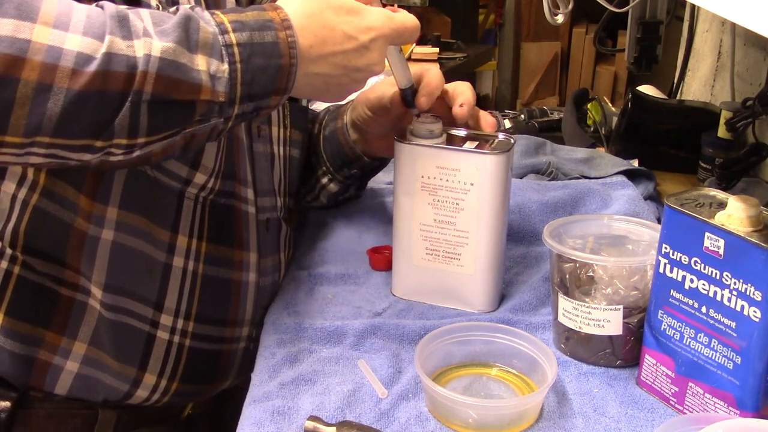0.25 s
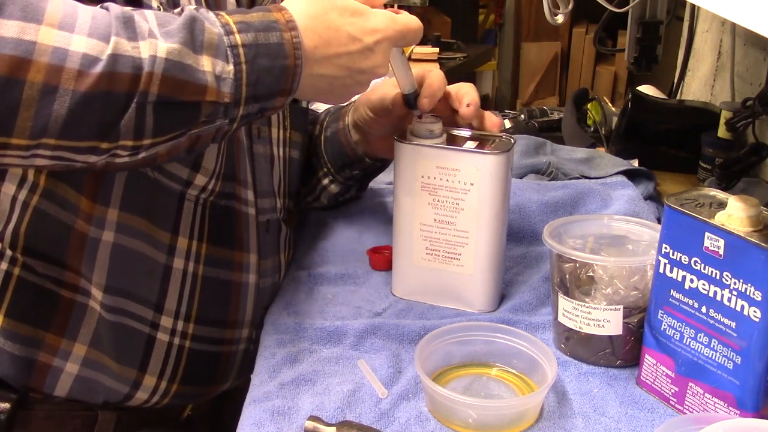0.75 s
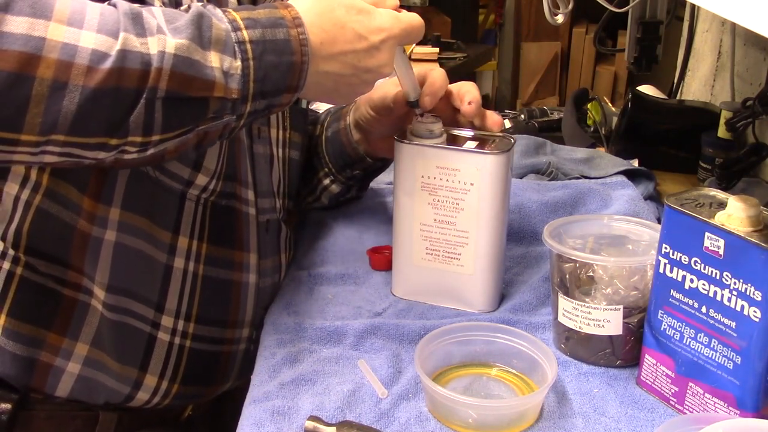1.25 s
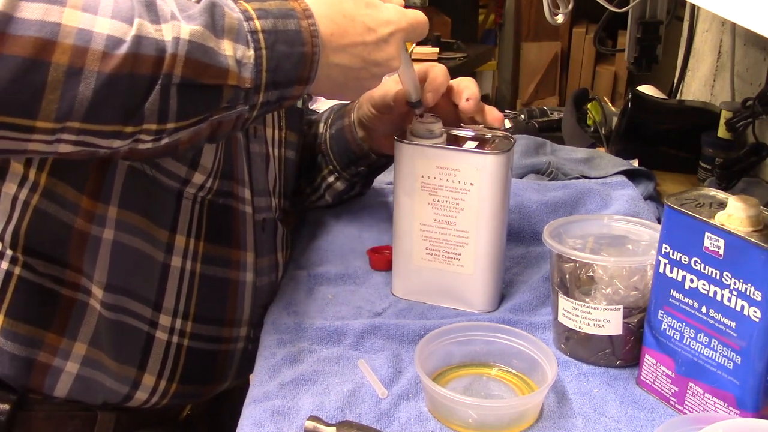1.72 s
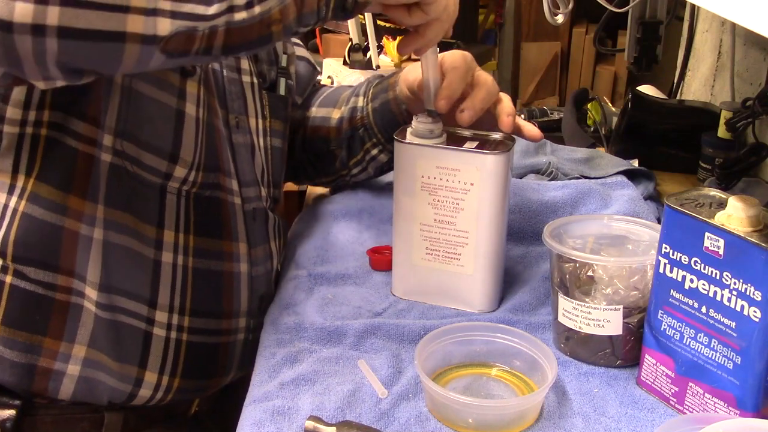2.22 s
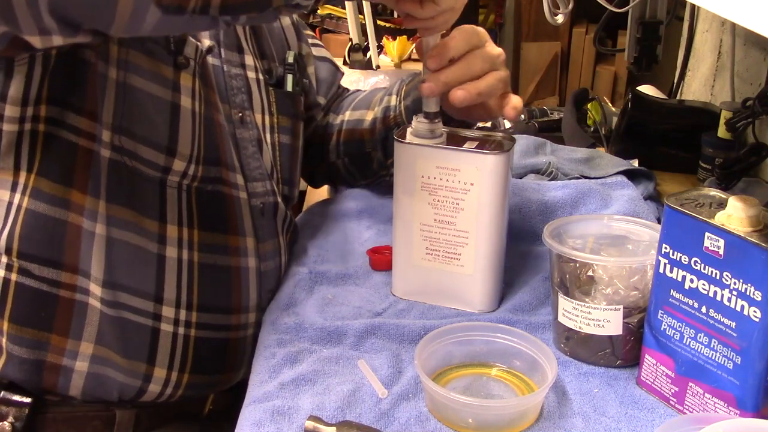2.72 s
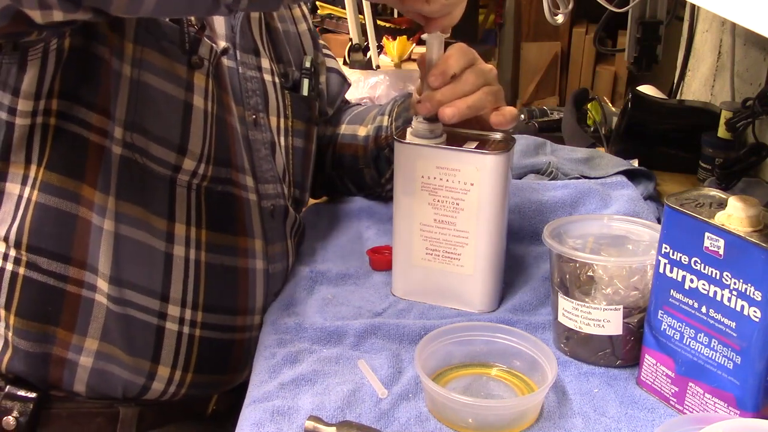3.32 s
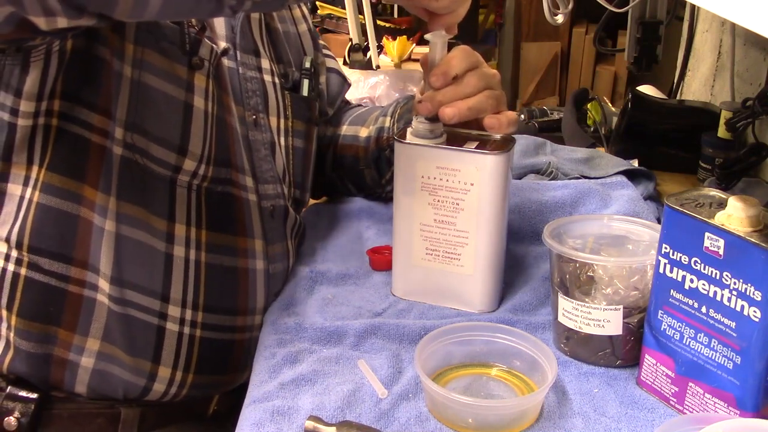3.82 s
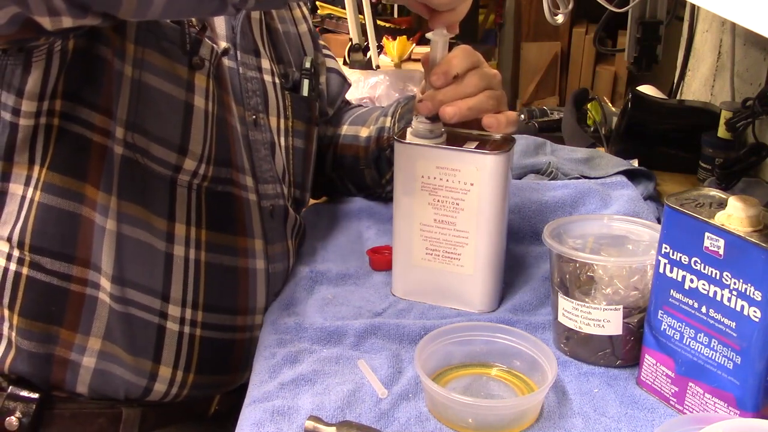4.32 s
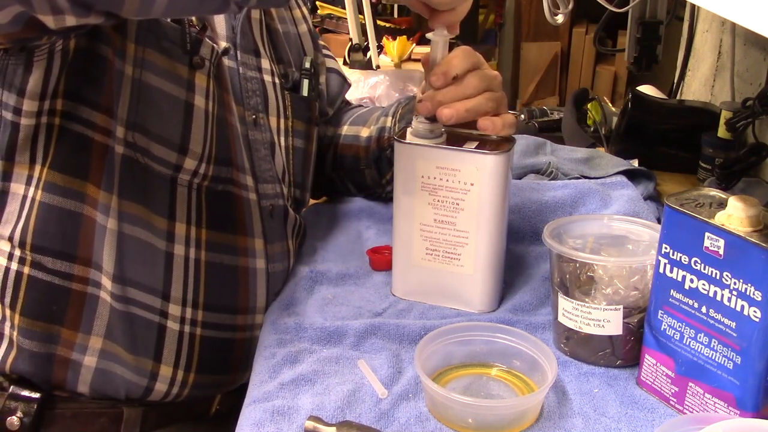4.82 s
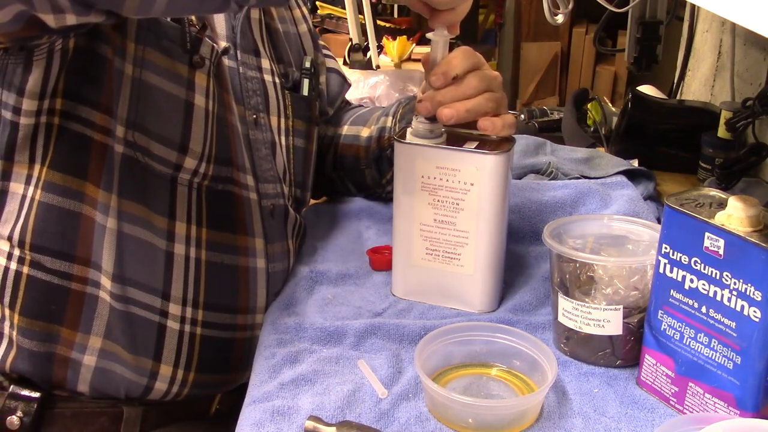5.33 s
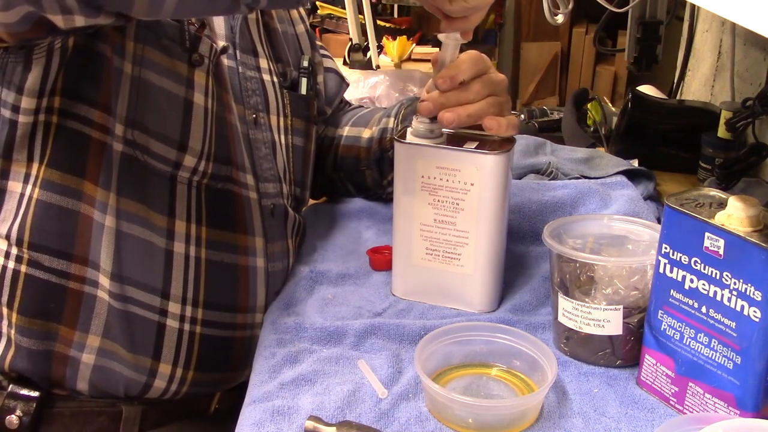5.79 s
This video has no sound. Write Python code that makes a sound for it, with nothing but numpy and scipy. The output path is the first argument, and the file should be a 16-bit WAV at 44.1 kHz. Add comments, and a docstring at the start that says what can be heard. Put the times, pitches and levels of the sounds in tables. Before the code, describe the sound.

In a small workshop with a soft fan and a low mains hum, a syringe gives a short, raspy, bubbling slurp as it draws liquid and air. The slurp thins out, and scattered small clicks and dull taps of plastic on a metal can follow, with very faint finger squeaks. After two sharper knocks, little but the room noise remains, apart from one faint late tap. The handling sounds are close, with a short room echo.

```python
"""A small workshop, one microphone close to a metal can. A plastic syringe sucks at thick liquid in the
can's neck: air breaks through at the tip in spurts that pop, gurgle and hiss in the barrel's resonances.
Later, just as close, the syringe taps the can, whose wall rings, and fingers rub on the plastic.
The room answers with a short tail; behind it all lie a fan's rush and a mains hum."""
import sys
import numpy as np
from scipy import signal
from scipy.fft import rfft, irfft, next_fast_len
from scipy.io import wavfile

SR = 44100
rng = np.random.default_rng(int(sys.argv[2]) if len(sys.argv) > 2 else 0)


def pcm_store(signal):
    """Save signal as 16-bit PCM."""
    levels = np.round(np.clip(np.atleast_2d(signal), -1, 1) * 32767)
    wavfile.write(sys.argv[1], SR, levels.astype(np.int16).T)


N = 267069

# air breaking in at the tip: (time [s], hiss drive [dB], pop drive [dB], gurgle drive [dB], open for [s])
SPURTS = [(0.374, -41, -22, -20, 0.0043), (0.383, -26.5, -8, -12, 0.006), (0.4071, -21, -9, 12.5, 0.004),
          (0.4253, -15, 17.5, 14, 0.0027), (0.4513, -17, -6, 3, 0.0053), (0.477, -15.5, 9.5, 14.5, 0.0058),
          (0.497, -15, 10, 11, 0.0055), (0.5108, -15, 14, -1, 0.005), (0.5284, -14.5, 13, 5, 0.0057),
          (0.5467, -16, 14.5, 17, .007), (0.562, -14.5, 11, 10, 0.0078), (0.5759, -15.5, 6, 14, 0.011),
          (0.6017, -17, 0, 10, 0.0087), (0.624, -16.5, -9, 9, 0.02), (0.641, -17, -2, -4, 0.0051),
          (0.662, -16, 5, 13, 0.0081), (0.6787, -15.5, 7, 16, 0.011), (0.706, -15, 13, -2, 0.015),
          (0.735, -16.5, 12, 2, 0.018), (0.787, -17, 14, -6, 0.033), (0.8383, -17, 12.5, -2, 0.025),
          (0.8739, -21, 5, 11, 0.037), (0.9185, -17.5, -5, -8, 0.031), (0.9465, -18, 1, -7, 0.022),
          (0.9821, -19, 7, 0, 0.032), (1.038, -20.5, 6.5, 0, 0.023), (1.0657, -20, 5, 14, 0.023),
          (1.0864, -18.5, 3, 0, 0.043), (1.125, -18.5, -6, -9, 0.029), (1.15, -23, -11, 0, 0.02),
          (1.175, -23.5, -5, 4, 0.0075), (1.226, -22.5, -3, 15, 0.005), (1.317, -51, -26, -26, .004),
          (1.3616, -36, -18, -17, .005), (1.37, -27.5, -10, -13, 0.0042), (1.4126, -36, -7, -11, 0.0046),
          (1.4529, -56, -24, -24, .002)]
# brightness of the hiss: (time [s], tilt about 8 kHz [dB/octave])
HISS_TILT = [(.375, 0), (.42, -3), (.5, -2.5), (.6, -2.4), (.8, -2.3), (.93, -2.1), (1.1, -0.5),
             (1.2, -3.5), (1.25, -5.5), (1.36, 5), (1.42, 5)]
# the hiss swells and sinks around one high pitch: (time [s], boost [dB])
HISS_SHINE = [(.4, -1.5), (.6, -3.5), (.75, -0.5), (.8, -1), (.9, 5.5), (.95, 3), (1.02, -3), (1.09, 1),
              (1.17, -6), (1.23, 0)]
# air and wall resonances of the barrel, low to high: (pitch [Hz])
BARREL_HZ = [490, 1579, 1640, 1850, 2100, 2430, 3190, 4140, 4350, 4480, 4620, 4770, 5340, 5900, 6545, 6680,
             6980, 7750, 7975, 8225, 8790, 9300, 9760, 9900, 10380, 10520, 11100, 11800, 12100, 12730,
             13500, 14050, 14700, 15350]
# the same resonances: (width [Hz], gain at 0.8 s [dB], growth as the barrel fills [dB/s])
BARREL_SHAPES = [(55.6, -3.5, -6.5), (47, 0.5, 3), (58.4, -8.5, 3), (195, -17, -13), (150, -39, -17),
                 (84, -45, -4), (35.8, -10, 8), (80, -34, 0), (60, -10, 6), (120, -24, 21), (107, -11, 9),
                 (184, -15, 9), (200, -32, -6), (120, -17, -1), (53.6, -3, 7), (99, -12.5, -2),
                 (100, -27, -1), (134, -8.5, -6), (54.3, -8.5, 16), (45, 1, 3), (60, -10, 8),
                 (76, -3, -1.5), (80, -23, 11), (140, -5, 4.5), (45, -23, 14), (60.3, -5.5, -1),
                 (100, -18, -8), (80, -14, -3), (53, -15, -6), (46, -11.5, -3), (100, -18, -4),
                 (140, -33, 1), (120, -22, -2), (180, -36, 1)]
# bands the barrel does not pass: (pitch [Hz], width [Hz])
BARREL_NOTCHES = [(2950, 230), (3400, 310), (7280, 410)]
# syringe on can: (time [s], crack [dB], crack top [Hz], plastic ring over the crack [dB],
# wall [dB], wall centre [Hz], wall spread [octaves], thud [dB])
TAPS = [(1.734, -65, 5000, -6, -67, 1500, .45, -33.5), (1.766, -67, 12100, 6, -66, 1500, .45, -58),
        (1.837, -53.5, 11000, -10, -63, 1500, .45, -59), (1.941, -59, 11000, -8, -53, 1520, 0.97, -54),
        (1.987, -45, 4500, -14, -57, 1500, .45, -62), (2.055, -46, 2800, -8, -48.5, 1700, 0.64, -57),
        (2.255, -55, 11000, -10, -51.5, 1530, 0.97, -58), (2.318, -61, 5000, -6, -52, 1500, 0.51, -36),
        (2.376, -53, 5000, -10, -48, 2480, 0.35, -32), (2.5008, -28, 4000, -12.5, -31.5, 1430, 0.24, -40),
        (2.505, -58, 4000, -9, -31, 1810, 0.13, -55), (2.525, -57, 2940, -6, -51, 1700, .3, -31.5),
        (2.5585, -41.5, 3500, -11, -45, 1700, 0.69, -43), (3.0277, -52.5, 4970, 0, -35, 1560, 0.11, -30.5),
        (3.090, -60, 3000, -6, -47, 1590, 0.2, -33.5), (3.282, -58, 2500, -6, -42.5, 1700, 0.24, -33),
        (3.5013, -24, 8700, 4, -26, 1110, 0.41, -31.5), (3.711, -60, 3500, -8, -54, 2500, .3, -61),
        (5.578, -59, 9000, -9, -61, 1500, 0.64, -39)]
# stiff plastic under a tap: (pitch [Hz], width [Hz], gain [dB])
PLASTIC_MODES = [(1800, 900, -3), (3250, 700, 2), (5300, 1100, 4), (6800, 1400, 3), (8150, 1000, 2),
                 (10500, 1800, -7)]
# the can's metal wall: (pitch [Hz], t60 [s])
WALL_MODES = [(720, 0.03), (960, 0.034), (1125, 0.091), (1290, 0.024), (1440, 0.037), (1561, 0.067),
              (1690, 0.039), (1776, 0.034), (1985, 0.03), (2500, 0.08), (3170, 0.077)]
# air and liquid inside the can: (pitch [Hz], t60 [s], gain [dB])
THUD_MODES = [(471, 0.05, 1.5), (610, 0.033, -1.5), (850, 0.033, -6.5)]
# finger strokes, squeaky where narrow: (time [s], length [s], level [dB], centre [Hz], width [Hz])
RUBS = [(1.96, .05, -69, 8500, 5000), (2.06, .08, -72, 8500, 6000), (2.17, .04, -71, 7000, 4000),
        (2.247, .02, -66, 6000, 400), (2.245, .08, -66, 8000, 5000), (2.268, .045, -66, 8700, 500),
        (2.285, .035, -67, 5950, 300), (2.425, .06, -68, 8500, 3000), (2.549, .017, -62, 8000, 5000),
        (5.56, .05, -68, 6000, 4500)]
# spectrum of the fan's rush: (frequency [Hz], relative density [dB])
FAN_SPECTRUM = [(25, -39.5), (86, -24.5), (107, -15), (150, -10), (200, -9), (246, -2.5), (399, -4.5),
                (598, -4.5), (762, -8.5), (900, -9.5), (1350, -13.5), (1620, -19.5), (3720, -28.5),
                (9000, -41), (15500, -50.5)]
# wavering tones in the rush: (pitch [Hz], width [Hz], rms level [dB])
FAN_TONES = [(198.7, 6.4, -66.5), (250.5, 7.1, -59.5), (290.7, 8.7, -61), (368.5, 21, -64),
             (504, 10.6, -63), (592.8, 23, -56.5), (632.4, 30, -62.5), (851.5, 23, -63), (958, 11, -67),
             (1423, 21, -71)]


def syringe_slurp():
    """Close up: each spurt opens with a pop, holds a hiss and dies as the liquid closes the tip again."""
    start, hiss_db, pop_db, gurgle_db, open_s = np.array(SPURTS).T[:, :, None]
    size = round(1.7 * SR)
    t = np.arange(size) / SR
    coarse_t = t[::8]
    rise_s, close_t60 = 0.00052, 0.02 + 3.7 * open_s   # a long spurt also dies slowly
    age = coarse_t - start
    opening_db = 20 * np.log10(np.clip(age / rise_s, 1e-6, 1))
    envelope_db = hiss_db + opening_db - 60 * np.maximum(age - rise_s - open_s, 0) / close_t60
    tilt_db = np.interp(start, *np.transpose(HISS_TILT))
    shine_db = np.interp(start, *np.transpose(HISS_SHINE))

    def kicks(db):
        """One impulse as each spurt opens."""
        train = np.full(size, 1e-18)
        train[np.round(start * SR).astype(int)] = from_db(db)
        return train

    pops = resonate(kicks(pop_db), hz=1700, width_hz=680)
    gurgles = resonate(kicks(gurgle_db), BARREL_HZ[0], width_hz=150)
    jet = butterworth(rms_one(grainy_noise(size, spread_db=6.1)), 1, 3000, "high")   # spray makes it grainy

    def drive(hz, noise):
        """Flow noise as felt at one pitch, plus gurgles for the lowest resonance or pops for the rest."""
        shine = shine_db * pitch_bell(hz, centre_hz=9500, octaves=0.23)
        flow = from_db(np.max(envelope_db + shine + tilt_db * np.log2(hz / 8000), axis=0))
        return np.interp(t, coarse_t, flow) * noise + (gurgles if hz == BARREL_HZ[0] else pops)

    tip_hiss = from_db(-25.5) * resonate(drive(13000, jet[::-1]), hz=11000, width_hz=5000)
    # the liquid film bursts as a spurt opens, more weakly for a long or a thin, bright one
    films = kicks(hiss_db - 298 * open_s - np.maximum(tilt_db, 0))
    bursts = rng.standard_normal(size) * signal.fftconvolve(films, decay(t60=0.015, size=2000))[:size]
    crackle = from_db(-6.5) * resonate_twice(bursts, hz=4700, width_hz=1600)
    out = np.zeros(N)
    out[:size] = tip_hiss + crackle
    slosh_db, slosh_per_s = 1.5, 25   # each resonance wavers on its own as the liquid sloshes
    for k, (hz, (width_hz, db, growth_db)) in enumerate(zip(BARREL_HZ, BARREL_SHAPES)):
        waver_db = slosh_db * np.interp(t * slosh_per_s, np.arange(100), rng.standard_normal(100))
        gain = from_db(db + growth_db * (t - .8) + waver_db)
        polarity = 1 if hz < 1700 else (-1) ** k   # the close low pair starts in step, then beats
        out[:size] += polarity * resonate(gain * drive(hz, np.roll(jet, 997 * k)), hz, width_hz)
    for hz, width_hz in BARREL_NOTCHES:
        out -= resonate(out + 1e-18, hz, width_hz)
    return out


def can_taps():
    """Close up: plastic cracks on the can, then the wall modes near the spot swing up over a dull thud."""
    out, size = np.zeros(N), 6000
    t = np.arange(size) / SR
    swing_up = 1 - np.exp(-t / 0.0023)
    wall_hz, wall_t60 = np.array(WALL_MODES).T[:, :, None]
    modes = np.sin(2 * np.pi * wall_hz * t) * decay(wall_t60, size) * swing_up
    thud = sum(from_db(db) * np.sin(2 * np.pi * hz * t) * decay(t60, size) for hz, t60, db in THUD_MODES)
    thud *= swing_up
    click = from_db(15) * (t == 0)
    for time_s, crack_db, top_hz, ring_db, wall_db, centre_hz, octaves, thud_db in TAPS:
        splinters, signs = rng.standard_normal((2, size))
        contact = butterworth(click + splinters * decay(t60=.02, size=size), 2, top_hz, "low")
        ring = sum(from_db(db) * resonate(contact, hz, width_hz) for hz, width_hz, db in PLASTIC_MODES)
        crack = butterworth(contact, 1, 900, "high") + from_db(ring_db) * ring
        shares = pitch_bell(wall_hz, centre_hz, octaves) * np.sign(signs[:len(WALL_MODES), None])
        wall = (shares * modes).sum(0)
        at = round(time_s * SR)
        out[at:at + size] += from_db(crack_db) * crack + from_db(wall_db) * wall + from_db(thud_db) * thud
    return out


def finger_rubs():
    """Faint even this near: skin on plastic makes short swells of grainy, high noise."""
    out, size = np.zeros(N), 4410
    t = np.arange(size) / SR
    for time_s, length_s, db, hz, width_hz in RUBS:
        friction = rms_one(resonate_twice(grainy_noise(size, spread_db=5), hz, width_hz))
        swell = np.sin(np.pi * np.clip(t / length_s, 0, 1))
        at = round(time_s * SR)
        out[at:at + size] += from_db(db) * swell * friction
    return out


def workshop_echo(near):
    """The room at the microphone: close surfaces answer first, then a bright, diffuse tail dies away."""
    size, gap_s, echo_db = SR // 2, .002, -16.5
    tail = butterworth(rng.standard_normal(size), 1, [3800, 8000], "band")
    tail *= from_db(4) * decay(t60=0.064, size=size) + decay(t60=0.3, size=size)
    tail[:round(gap_s * SR)] = 0
    return from_db(echo_db) * signal.fftconvolve(near, tail / np.sqrt(np.sum(tail ** 2)))[:N]


def fan():
    """In the background: a steady rush of air with faint wavering tones."""
    size = next_fast_len(N)
    curve_hz, curve_db = np.transpose(FAN_SPECTRUM)
    bins_hz = np.maximum(np.fft.rfftfreq(size, 1 / SR), 1)
    spectrum = from_db(np.interp(np.log(bins_hz), np.log(curve_hz), curve_db))
    rush = irfft(rfft(rng.standard_normal(size)) * spectrum, size)[:N]
    air = rng.standard_normal(N)
    tones = sum(from_db(db) * rms_one(resonate_twice(air, hz, width_hz)) for hz, width_hz, db in FAN_TONES)
    return from_db(-47) * rms_one(rush) + tones


def mains_hum(hz=120, rms_db=-63):
    """Under the fan: one steady, low tone from the mains."""
    return np.sqrt(2) * from_db(rms_db) * np.sin(2 * np.pi * hz * np.arange(N) / SR)


def from_db(db):
    """Gain of a level in dB."""
    return 10 ** (np.asarray(db) / 20)


def rms_one(x):
    """Scaled to rms 1."""
    return x / np.sqrt(np.mean(x ** 2) + 1e-20)


def decay(t60, size):
    """Exponential fall from 1, by 60 dB in t60 seconds."""
    return from_db(-60 * np.arange(size) / SR / t60)


def grainy_noise(size, spread_db):
    """Noise whose level jumps at every sample."""
    return rng.standard_normal(size) * from_db(spread_db * rng.standard_normal(size))


def pitch_bell(hz, centre_hz, octaves):
    """Bell-shaped weight over pitch, 1 at the centre."""
    return np.exp(-(np.log2(hz / centre_hz) / octaves) ** 2)


def butterworth(x, order, hz, kind):
    """Low-, high- or band-pass filter."""
    return signal.sosfilt(signal.butter(order, hz, kind, fs=SR, output="sos"), x)


def resonate(x, hz, width_hz):
    """Two-pole resonance with gain 1 at its peak."""
    r = np.exp(-np.pi * width_hz / SR)
    poles = [1, -2 * r * np.cos(2 * np.pi * hz / SR), r * r]
    return signal.lfilter([(1 - r * r) / 2, 0, (r * r - 1) / 2], poles, x)


def resonate_twice(x, hz, width_hz):
    """Two equal resonances in series, for steeper skirts."""
    return resonate(resonate(x, hz, width_hz), hz, width_hz)


def scene():
    """At the microphone, in mono: hands at the can up close, their echo, and the room tone behind."""
    near = syringe_slurp() + can_taps() + finger_rubs()
    return (near + workshop_echo(near) + fan() + mains_hum())[None]


def record(dry):
    """The recorder cuts the top steeply."""
    cutoff_hz = 15750
    return signal.sosfilt(signal.ellip(12, .5, 70, cutoff_hz, fs=SR, output="sos"), dry)


dry = scene()
out = record(dry)
pcm_store(out)
```